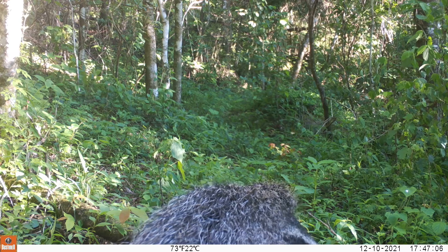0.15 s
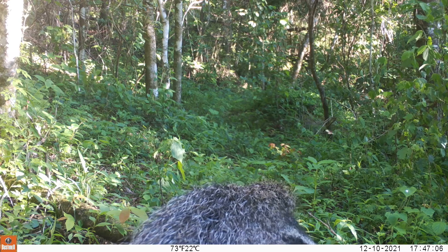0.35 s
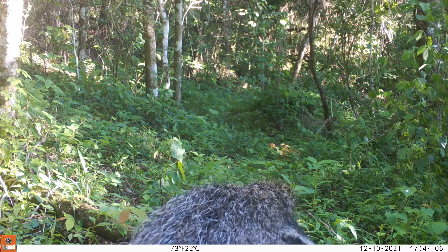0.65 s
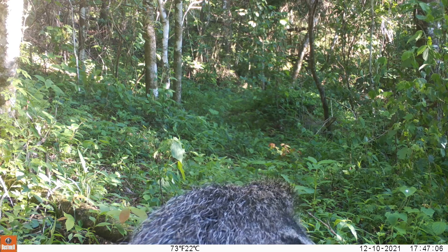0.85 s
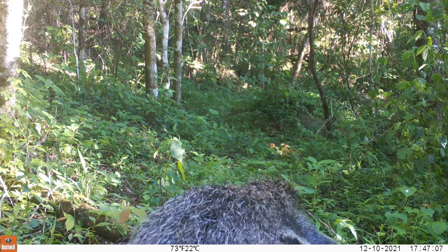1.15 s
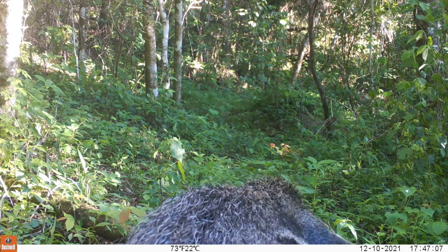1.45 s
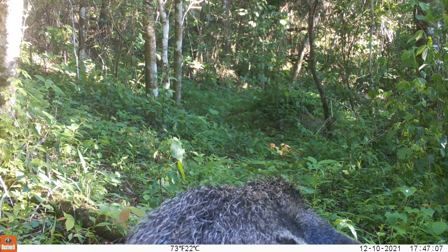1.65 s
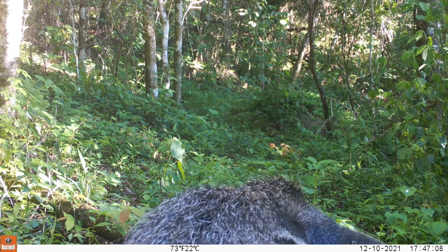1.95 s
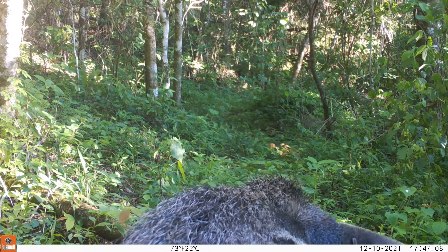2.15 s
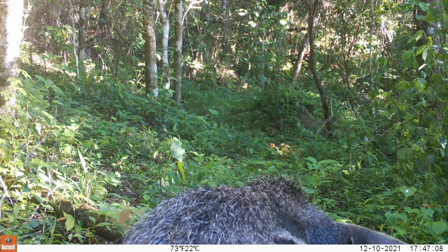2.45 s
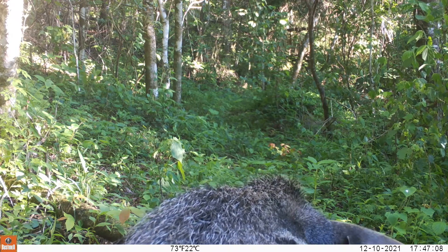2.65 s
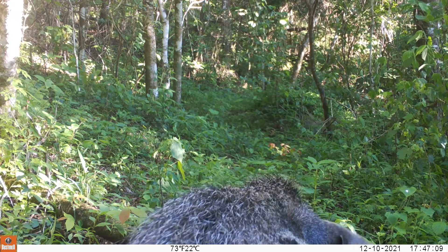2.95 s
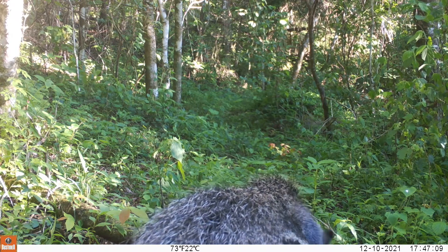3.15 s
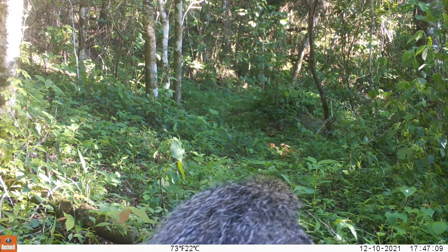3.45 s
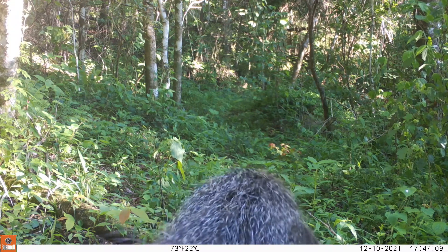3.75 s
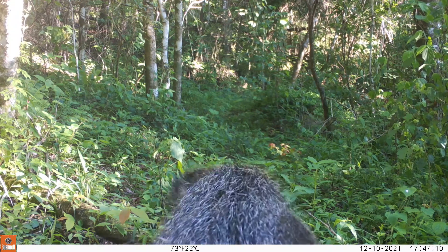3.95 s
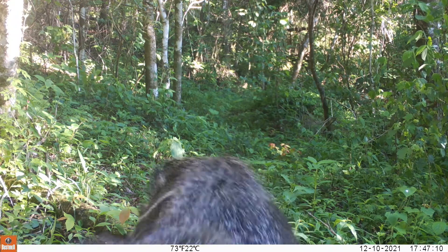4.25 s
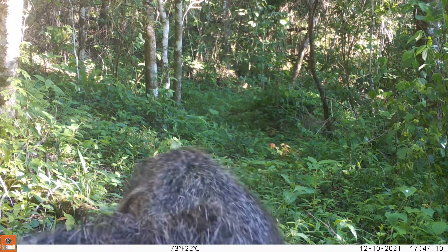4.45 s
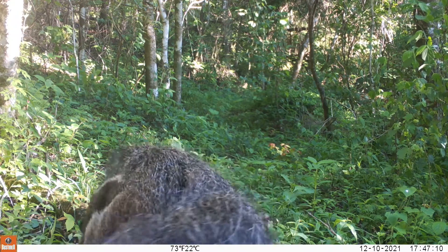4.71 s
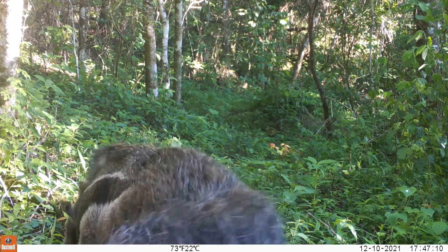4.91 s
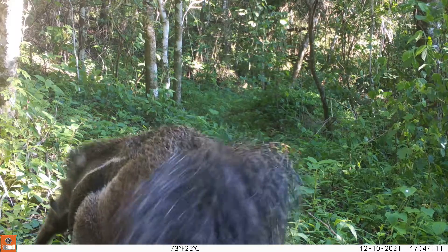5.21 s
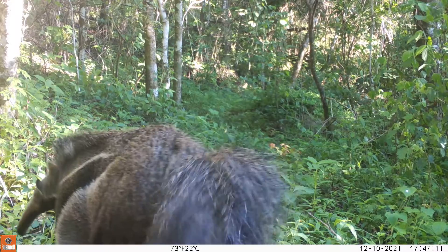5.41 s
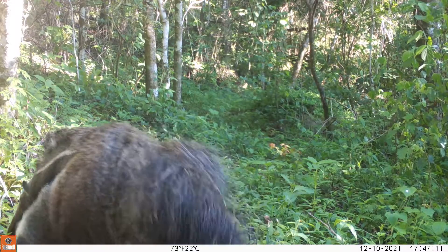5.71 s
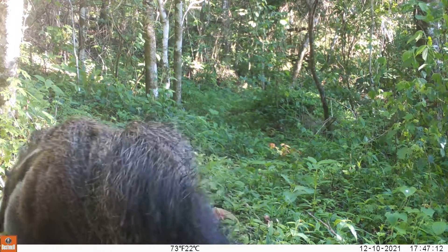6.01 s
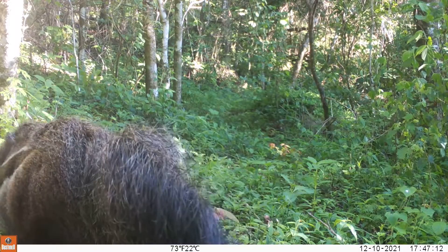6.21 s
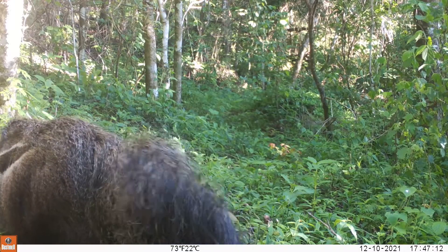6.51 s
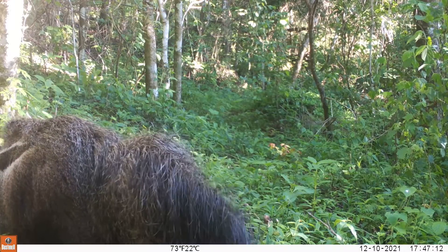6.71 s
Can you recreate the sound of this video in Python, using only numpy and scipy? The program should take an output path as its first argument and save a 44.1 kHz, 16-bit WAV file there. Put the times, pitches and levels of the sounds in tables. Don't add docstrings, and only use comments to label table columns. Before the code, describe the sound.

In forest undergrowth, a thin high cricket chorus shimmers over soft air and faint hiss. A small bird gives four short, buzzy rising chirps, widely spaced and echoing among trees, with faint distant coos, a scold and whistles between. From about three seconds a big animal brushes leaves close to the microphone, snapping twigs most sharply after five seconds.

```python
import sys
import numpy as np
from scipy import signal
from scipy.fft import rfft, irfft, next_fast_len
from scipy.io import wavfile

SR = 44100
rng = np.random.default_rng(int(sys.argv[2]) if len(sys.argv) > 2 else 0)


def nominal_scale(level):
    x = np.asarray(level, float) / 20
    return 10 ** x


def file_out(sig):
    cols = np.atleast_2d(sig).T
    lim = np.clip(cols, -1, 1)
    pcm = np.round(lim * 32767).astype(np.int16)
    wavfile.write(sys.argv[1], SR, pcm)


N = 302967

# time in seconds, level in dB.
CHORUS_SWELL = [(0.0, -53.5), (0.5, -54.5), (0.73, -56.5), (0.96, -53.5), (1.22, -58), (1.68, -55),
                (2.37, -55), (2.9, -58.5), (3.46, -53.5), (4.11, -53.5), (4.5, -58), (5.24, -52.5),
                (5.53, -56.5), (5.75, -57), (6.26, -53.5), (6.54, -51), (6.87, -54)]
# pitch in Hz, wing strokes per second, level in dB.
CHORUS_SINGERS = [(5420, 25, 4), (5540, 47, -3), (5593, 27, 0.5), (5636, 38, 1), (5708, 29, -1),
                  (5814, 58, -12), (5796, 73, -1), (5985, 75, -10), (5680, 59, -2)]
# middle in seconds, length in seconds, level in dB.
NEAR_BOUTS = [(.65, .2, -69), (1.107, 0.59, -67), (1.596, 0.4, -61.5), (2.826, 0.44, -67),
              (3.377, 0.93, -63.5), (4.08, 0.16, -66), (4.49, 0.084, -64), (4.98, 0.44, -63.5),
              (5.275, 0.1, -58), (5.47, 0.08, -71), (5.802, 0.15, -70)]
# frequency in Hz, level in dB.
DRONE_COLOUR = [(2500, -18.5), (2900, -4), (3200, 0.5), (3700, -1.5), (4100, -12), (4600, -19.5)]
# frequency in Hz, level in dB.
AIR_COLOUR = [(12, -25), (22, -17.5), (90, -11), (200, -15), (850, -22), (1900, -28.5), (3300, -31),
              (4700, -24), (6500, -25.5), (8900, -32.5), (10300, -28.5), (11800, -35.5), (13000, -36),
              (16000, -38.5)]
# frequency in Hz, level in dB.
MAINS_HUM = [(30, -76.5), (60, -79), (90, -79), (150, -83.5), (180, -84)]
# start in seconds, length in seconds, pitch in Hz, level in dB, fade in dB.
COO_NOTES = [
    (.01, .06, 1030, -73, -15),
    (.7, .08, 1040, -72, -15),
    (1.34, .05, 1030, -66, -40),
    (6.64, .22, 525, -74, -.6),
]
# time in seconds, peak in dB, ring in Hz.
LEAF_TICKS = [(0.1964, -63, 6460), (0.2843, -53, 7150), (0.969, -67, 7000), (1.281, -63, 7160),
              (1.4277, -57, 7640), (1.895, -51, 6430), (1.932, -53, 9500), (2.2233, -53, 6900),
              (2.9462, -53, 6770), (3.2283, -51, 7460), (3.8264, -52, 6870), (3.8571, -51, 8160),
              (4.712, -45, 7180), (5.763, -55, 7240), (5.853, -55, 6710), (6.0244, -48, 7300),
              (6.2168, -51, 7180), (6.266, -52, 7430), (6.3874, -54, 6850), (6.6324, -60, 6340),
              (6.8159, -69, 7450)]
# time in seconds, peak in dB, ring in Hz, low part in dB, top in dB.
TWIG_CRACKS = [(1.4959, -44, 7460, -2, -8), (2.5713, -34, 6200, -12, -29), (3.7491, -51, 6610, -6, -16),
               (4.194, -37, 7790, -7, -22), (5.1794, -43, 7860, -23, -21), (5.2609, -25, 7280, -14, -19),
               (5.457, -40, 6820, -6, -25), (6.0198, -37, 6840, -6, -33), (6.055, -25.5, 8100, -30, -7),
               (6.125, -21, 7180, -23, -14), (6.3723, -24.5, 7100, -41, -63), (6.5246, -31, 8100, -20, -33)]
# time in seconds, peak in dB, ring in Hz, low part in dB, top in dB.
TWIG_BREAKS = [
    (5.25, -18, 7770, -9.5, -8),
    (5.5706, -27, 7350, -8.5, -23),
    (5.6066, -34.5, 8500, -7.5, -18),
    (6.5962, -39, 6240, -7.5, -26),
    (6.608, -37.5, 7100, -13, -29),
]
# time in seconds, peak in dB, ring in Hz, low part in dB, top in dB.
STEM_TEARS = [(3.7184, -40, 8560, -21, -26), (3.8102, -41, 9040, -8, -17), (4.3774, -52, 8600, -26, -19),
              (4.4742, -45, 8830, -19, -19), (4.8234, -41, 7260, -16, -10), (5.42, -45, 6790, 2.5, -26),
              (5.4371, -34.5, 6900, -3, -36), (5.4394, -42, 6890, -5, -26), (5.9838, -32.5, 6540, -14, -19),
              (6.282, -40.5, 7000, -24, -34), (6.4357, -38, 6500, -26, -11)]
# start in seconds, length in seconds, effort in dB, first and top pitch in Hz.
CHIRP_CALLS = [
    (0.483, .195, -39.5, 3573, 4550),
    (2.247, .199, -38.5, 3276, 4778),
    (3.948, .202, -34.5, 3690, 4526),
    (5.818, 0.21, -39.5, 3302, 4780),
]
CHIRP_SOFT_START = [-29.5, -26, -34.5, -20]
CHIRP_SWELL = [1.7, 2.4, 1.26, 2.9]
CHIRP_CLIMB = [1.15, 1.1, 1.6, .8]
CHIRP_HOARSE = [-15.5, -17.5, -16, -19]
CHIRP_OVERTONE = [-29, -36, -46, -46]
# frequency in Hz, level in dB.
FOLIAGE_COLOUR = [(5500, 2), (7500, 13), (12000, -23)]
# frequency in Hz, level in dB.
BEAK_COLOUR = [(1100, -26), (2300, -14), (3500, -4), (4600, 0), (6900, -1), (7600, -14), (8500, -28)]
# start in seconds, length in seconds, pitch at the ends and top in Hz, level in dB.
ARCH_NOTES = [
    (1.967, .15, 3930, 4120, -70),
]
# start in seconds, length in seconds, first and last pitch in Hz, level in dB.
WHISTLE_NOTES = [
    (2.725, .07, 4700, 3500, -72),
    (2.985, .16, 4800, 3200, -72),
]
# time in seconds, effort in dB.
SLOW_TURN = [(3.15, -90), (3.22, -83), (3.27, -65), (3.5, -68.5), (3.68, -63.5), (3.97, -63.5), (4.2, -63),
             (4.56, -67), (4.95, -60), (5.2, -59), (5.34, -64), (5.75, -67.5), (5.92, -64.5), (6.12, -69),
             (6.34, -72), (6.5, -63), (6.65, -71.5), (6.87, -76)]
# middle in seconds, length in seconds, brushing in dB, body weight in dB.
COAT_SWEEPS = [(3.515, 0.3, -78, 8), (3.74, 0.066, -57.5, -16.5), (3.817, 0.032, -59, -19),
               (3.886, 0.061, -58.5, -21), (4.178, 0.076, -59, -16), (4.428, 0.18, -63.5, -20),
               (4.81, 0.064, -60.5, -29), (5.185, 0.041, -59, -9.5), (5.267, 0.11, -66, -22),
               (5.437, 0.081, -57, -18), (5.603, 0.066, -58.5, -23), (6.01, .09, -60, -20),
               (6.127, 0.035, -79, -8), (6.433, 0.067, -60, -13.5), (6.53, 0.078, -63, -14),
               (6.605, 0.018, -53.5, -12.5)]
# frequency in Hz, level in dB.
LEAF_COLOUR = [(1500, -78), (2500, -17.5), (3500, -8.5), (5000, 1), (7500, 1), (9000, -2.5), (11000, -26.5),
               (14000, -65)]
# frequency in Hz, level in dB.
DRY_LEAF_COLOUR = [(7000, -60), (9500, 8), (11000, 10), (13000, 2), (16000, -9)]
# frequency in Hz, level in dB.
FUR_COLOUR = [(1500, -19), (2600, -6), (3800, -2.5), (7000, -2), (8500, -22), (11000, -40)]


def evened(x):
    return x / np.sqrt(np.mean(x ** 2) + 1e-20)


def read(points, hz):
    f, value = np.transpose(points)
    return np.interp(np.log(hz + 1), np.log(f + 1), value)


def colour(x, points):
    size = next_fast_len(len(x))
    gain = nominal_scale(read(points, np.fft.rfftfreq(size, 1 / SR)))
    return irfft(rfft(x, size) * gain, size)[:len(x)]


def drift(count, per_s):
    steps = rng.standard_normal(int(count / SR * per_s) + 2)
    return np.interp(np.arange(count) * per_s / SR, np.arange(len(steps)), steps)


def turns(hz):
    return 2 * np.pi * np.cumsum(hz) / SR


def progress(length):
    return np.arange(0, length, 1 / SR) / length


def bump(t, middle_s, length_s):
    return .5 ** ((2 * (t - middle_s) / length_s) ** 2)


def add(mix, s, sound):
    part = mix[round(s * SR):][:len(sound)]
    part += sound[:len(part)]


def trees(x, t60, gap_s):
    t = np.arange(SR) / SR
    hits = rng.standard_normal(SR) * (rng.random(SR) < .1)
    taps = hits * nominal_scale(-60 * t / t60) * np.minimum(t / gap_s, 1)
    return signal.fftconvolve(x, taps / np.linalg.norm(taps))[:N]


def floor():
    t = np.arange(N) / SR
    hum = sum(nominal_scale(db) * np.sqrt(2) * np.sin(2 * np.pi * (hz * t + rng.random())) for hz, db in MAINS_HUM)
    air_db = -66.5 + .6 * drift(N, 4)
    return nominal_scale(air_db) * evened(colour(rng.standard_normal(N), AIR_COLOUR)) + hum


def wing(hz, rate, duty, wobble):
    stroke = (np.cumsum(rate * (1 + wobble * drift(N, 3))) / SR + rng.random()) % 1
    shape = np.sin(np.pi * np.clip(stroke / duty, 0, 1)) ** 0.59
    return evened(shape * np.sin(turns(hz * (1 + .1 * wobble * drift(N, 9)))))


def crickets():
    t = np.arange(N) / SR
    near = wing(5248, 34.2, .75, .03)
    near = evened(near + 0.27 * trees(near, 1.0, 0.0035))
    idle = nominal_scale(-76.5)
    bouts = idle + sum(nominal_scale(db) * bump(t, middle, length) for middle, length, db in NEAR_BOUTS)

    far = sum(nominal_scale(db + 3.3 * drift(N, 2.39)) * wing(hz, rate, 0.3, .06) for hz, rate, db in CHORUS_SINGERS)
    far = evened(0.64 * evened(far) + evened(trees(far, 0.99, 0.0074)))
    far_db = np.interp(t, *np.transpose(CHORUS_SWELL))

    drone = evened(colour(rng.standard_normal(N), DRONE_COLOUR))
    early_db, late_db, turn_s, swell_s = -78.5, -70, 4.07, 1
    drone_db = early_db + (late_db - early_db) * (.5 + .5 * np.tanh((t - turn_s) / swell_s))
    return bouts * near + nominal_scale(far_db) * far + nominal_scale(drone_db) * drone


def note(hz, db, wander_hz):
    unsteady = drift(len(hz), 120)
    tone = np.sin(turns(hz + wander_hz * unsteady))
    return nominal_scale(db + 2.1 * unsteady) * tone * signal.windows.tukey(len(hz), .15)


def coo(s, length, hz, db, fade_db):
    u = progress(length)
    return s, note(hz * (1 - 0.03 * u), db + fade_db * np.sqrt(u), 65)


def snap(s, db, hz, low_db, top_db, toughness):
    t = np.arange(900) / SR
    noise = rng.standard_normal((3, 900))
    bright = colour(noise[0], [(2500, -35), (0.82 * hz, -11), (hz, 0), (1.03 * hz, -6),
                               (16000, -20.5 + 0.37 * top_db)])
    dull = colour(noise[1], [(200, -10), (600, -12), (1500, -24.5), (2600, 2), (3600, 18), (5000, 6),
                             (7000, -38)])
    edge = colour(noise[2], [(8000, -56), (10500, -1), (12500, -16), (16000, -8)])
    thud = colour(noise[1], [(150, 1), (500, -3), (1600, -3.5), (2600, -33)])
    crack = t / (.0004 * np.clip(toughness, 1, 2) ** 3)
    fade_db = -60 * t / 0.036
    fall = crack * np.exp(1 - crack) + nominal_scale(-26 + fade_db) * np.minimum(crack, 1)
    ring = fall * evened(bright)
    knock = fall * nominal_scale(low_db) * evened(dull)
    crisp = fall * nominal_scale(top_db + 3.5) * evened(edge)
    jolt = nominal_scale(-30.5 + fade_db) * evened(thud)
    return s, nominal_scale(db - 1.5) * (ring + jolt + knock + crisp) / abs(ring).max()


def chirp(s, length, top_db, first_hz, top_hz, soft_db, swell, bend, hoarse_db, overtone_db):
    u = progress(length)
    n = len(u)
    peak_at = 0.74
    weak_db = soft_db * np.clip(1 - u / peak_at, 0, 1) ** swell
    weak_db = weak_db - 12.5 * np.clip((u - peak_at) / (1 - peak_at), 0, 1) ** 4
    climb_ends, sag_from = .87, .935
    hz = first_hz + (top_hz - first_hz) * np.minimum(u / climb_ends, 1) ** bend
    hz = hz - 0.107 * top_hz * np.clip((u - sag_from) / (1 - sag_from), 0, 1)

    depth = (0.87 + 0.019 * weak_db) * np.clip(20 * (climb_ends - u) + 1, 0, 1)
    throbs_per_s = np.linspace(160, 136, n)
    beat = turns(throbs_per_s * (1 + .05 * drift(n, 60)))
    throb = (1 - np.clip(depth, 0, 1) * (.5 + .5 * np.cos(beat))) ** 1.4
    unsteady = .012 * (1 - .9 * u ** 2) * drift(n, 150)
    phase = turns(hz * (1 + .012 * depth * np.sin(beat) + unsteady))

    overtone = nominal_scale(overtone_db - 0.23 * weak_db + 3.4 * drift(n, 130))
    tone = np.sin(phase) + overtone * (np.sin(2 * phase) + nominal_scale(-14) * np.sin(3 * phase))
    flutter = turns(490 + 90 * drift(n, 250))
    hoarse = np.sin(phase + flutter) + nominal_scale(-18.5 - 0.38 * weak_db) * np.sin(phase - flutter)
    hoarse = hoarse + 0.98 * drift(n, 900) * np.cos(phase)
    voice = tone + nominal_scale(hoarse_db - 0.59 * weak_db) * hoarse
    return s, nominal_scale(top_db + weak_db) * evened(throb) * voice * signal.windows.tukey(n, .05)


def scold():
    start_s, length_s = 1.005, 0.2
    t = np.arange(0, length_s, 1 / SR)
    n, u = len(t), t / length_s
    hz = 1216 - 800 * t
    db = -60 - 2.5 * u - 11 * u ** 6
    waver = np.sin(turns(58 + 6 * drift(n, 51.9)) + 1.47) * np.clip(t / 0.0078 - .6, 0, 1)
    phase = turns(hz * (1 + .095 * waver + .028 * drift(n, 200)))
    stack = np.zeros(n)
    for k in range(1, 8):
        opening = np.minimum(t / .025, 1) ** abs(k - 3)
        level = nominal_scale(read(BEAK_COLOUR, k * hz) + 5.6 * drift(n, 83))
        stack += opening * level * np.sin(k * phase)
    return start_s, nominal_scale(db) * evened(stack) * signal.windows.tukey(n, .04)


def arch(s, length, ends_hz, top_hz, db):
    bow = np.sin(np.pi * progress(length) ** .8)
    return s, note(ends_hz + (top_hz - ends_hz) * bow, db - 8 * (1 - bow), 25)


def whistle(s, length, first_hz, last_hz, db):
    u = progress(length)
    hz = last_hz + (first_hz - last_hz) * (1 - u) ** 2.8
    return s, note(hz, db + np.interp(u, [0, .25, 1], [-3, 0, -8]), 30)


def rustle():
    times, effort_db = np.transpose(SLOW_TURN)
    t = np.arange(times[0], times[-1], 1 / SR)
    n = len(t)
    turn = nominal_scale(np.interp(t, times, effort_db))
    sweeps = np.array([nominal_scale(db) * bump(t, middle, length) for middle, length, db, _ in COAT_SWEEPS])
    brush = np.sqrt(turn ** 2 + (sweeps ** 2).sum(0))
    crisp = nominal_scale(-13) * turn + nominal_scale(-3) * sweeps[1:].sum(0)
    weight = nominal_scale(-16) * turn + nominal_scale(np.transpose(COAT_SWEEPS)[3]) @ sweeps

    size = nominal_scale(2.5 * np.minimum(rng.exponential(1, n), 5)) * nominal_scale(1.6 * drift(n, 70))
    grains = size * (rng.random(n) < .15) * rng.standard_normal(n)
    leaves = brush * evened(colour(grains, LEAF_COLOUR))
    dry_leaves = nominal_scale(-8.0) * crisp * evened(colour(grains, DRY_LEAF_COLOUR))
    drag = nominal_scale(-69) * bump(t, 3.43, 0.44) ** 2 * evened(colour(grains / np.sqrt(size), FUR_COLOUR))
    swish = colour(rng.standard_normal(n), [(100, 8.5), (400, 3), (1200, 2.5), (2500, -4.5), (4000, -9)])
    return times[0], nominal_scale(2.5) * (leaves + dry_leaves + drag + weight * evened(swish))


def scene():
    bird, far, animal = np.zeros((3, N))
    for row in COO_NOTES:
        add(far, *coo(*row))
    for row in LEAF_TICKS:
        add(animal, *snap(*row, low_db=-12, top_db=-22, toughness=1.37))
    for stems, toughness in [(TWIG_CRACKS, 0.873), (TWIG_BREAKS, 1.2), (STEM_TEARS, 1.36)]:
        for row in stems:
            add(animal, *snap(*row, toughness))
    manners = zip(CHIRP_SOFT_START, CHIRP_SWELL, CHIRP_CLIMB, CHIRP_HOARSE, CHIRP_OVERTONE)
    for row, manner in zip(CHIRP_CALLS, manners):
        add(bird, *chirp(*row, *manner))
    add(far, *scold())
    for row in ARCH_NOTES:
        add(far, *arch(*row))
    for row in WHISTLE_NOTES:
        add(far, *whistle(*row))
    add(animal, *rustle())

    bird_echo = nominal_scale(-1.5) * colour(trees(bird, 0.51, 0.0067), FOLIAGE_COLOUR)
    far_echo = nominal_scale(1.0) * trees(far, 0.28, 0.0086)
    animal_echo = nominal_scale(-10) * trees(animal, 0.16, 0.00082)
    mix = bird + bird_echo + far + far_echo + animal + animal_echo + crickets() + floor()
    return np.array([mix, mix])


def low_pass(x):
    return signal.sosfilt(signal.butter(12, 16490, fs=SR, output="sos"), x)


def record(dry):
    edge = signal.firwin(201, 15850, window=("kaiser", 5), fs=SR)
    mix = signal.oaconvolve(dry, edge[None], "same")
    return low_pass(mix)


dry = scene()
out = record(dry)
file_out(out)
```